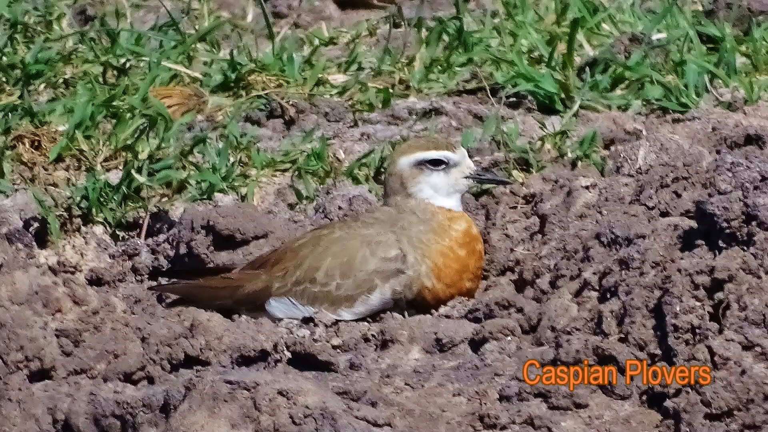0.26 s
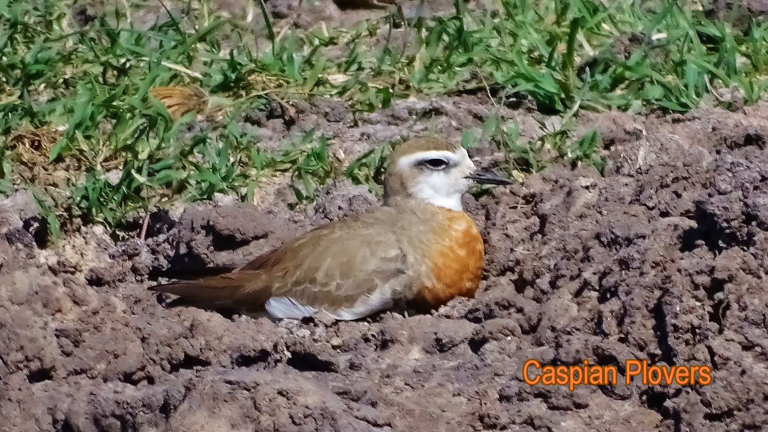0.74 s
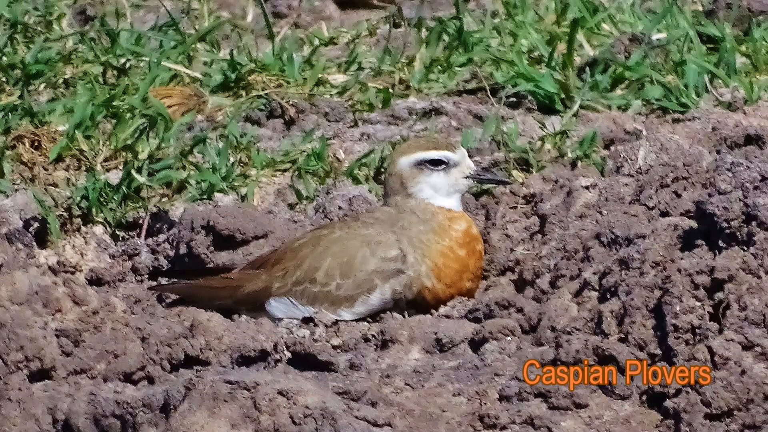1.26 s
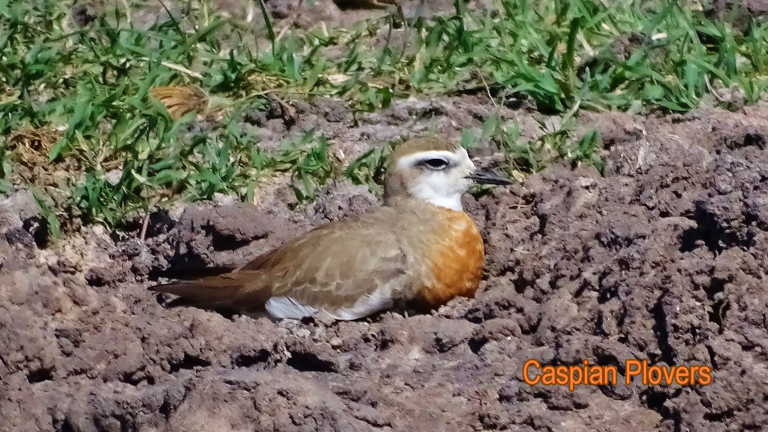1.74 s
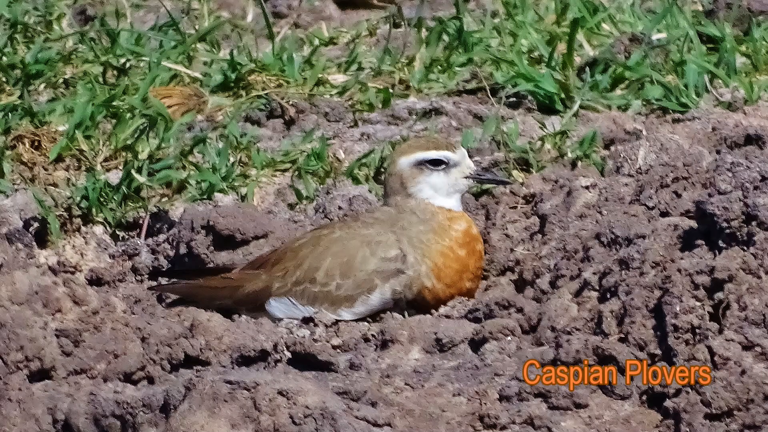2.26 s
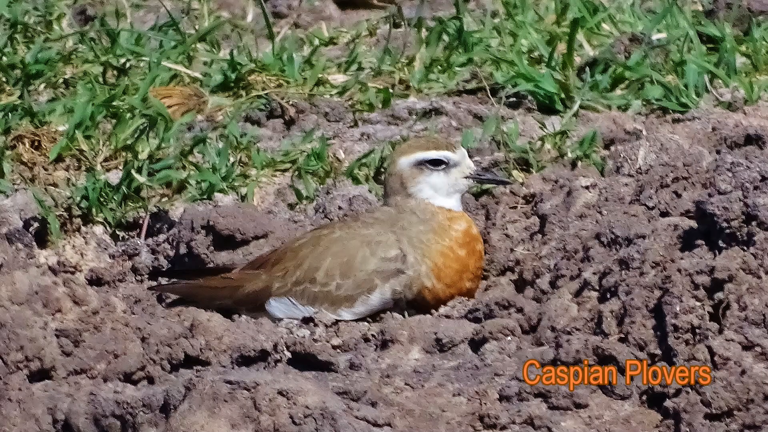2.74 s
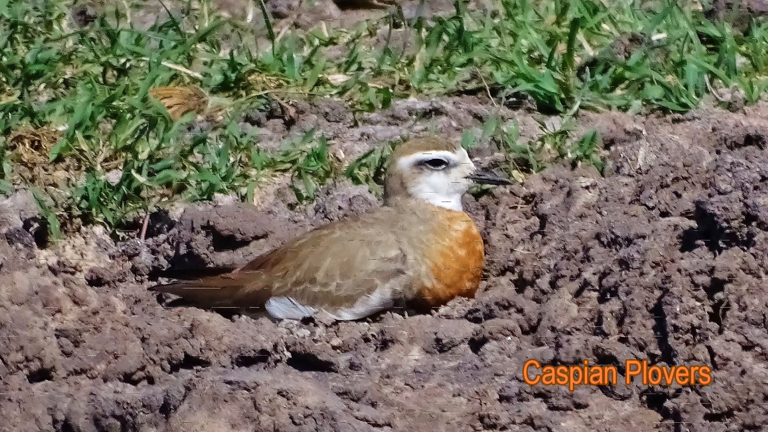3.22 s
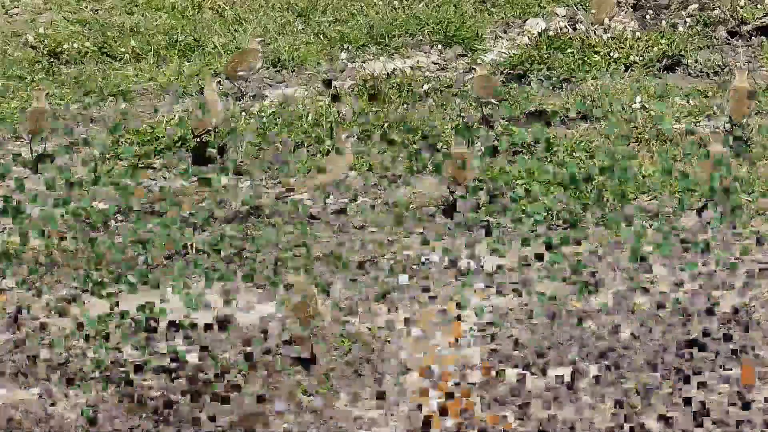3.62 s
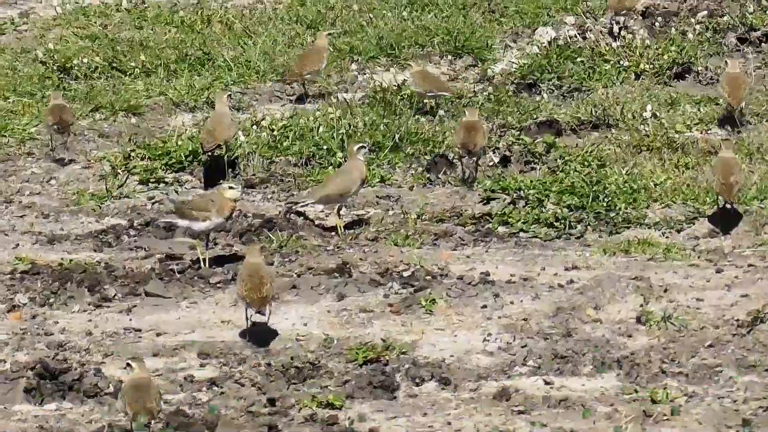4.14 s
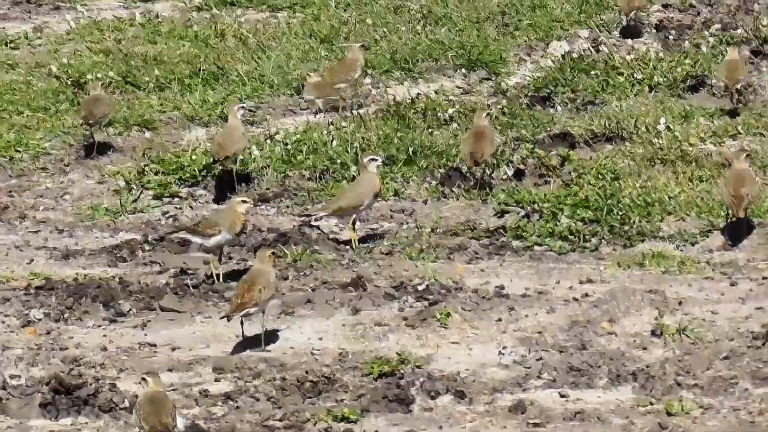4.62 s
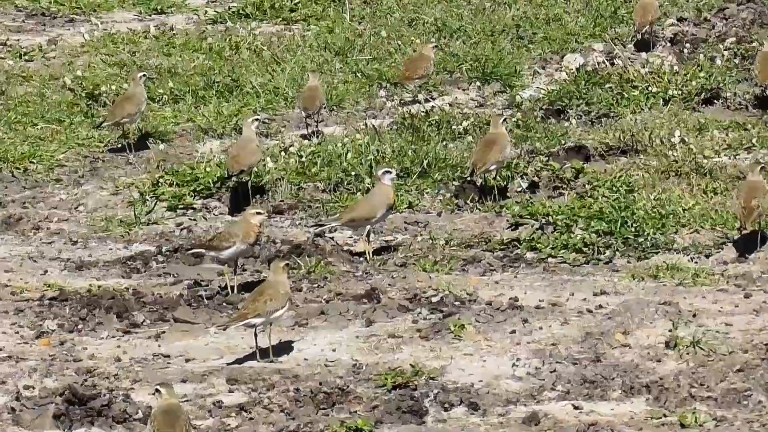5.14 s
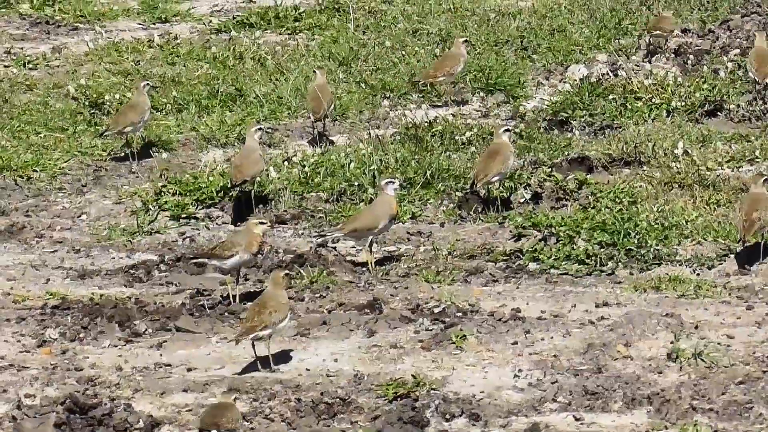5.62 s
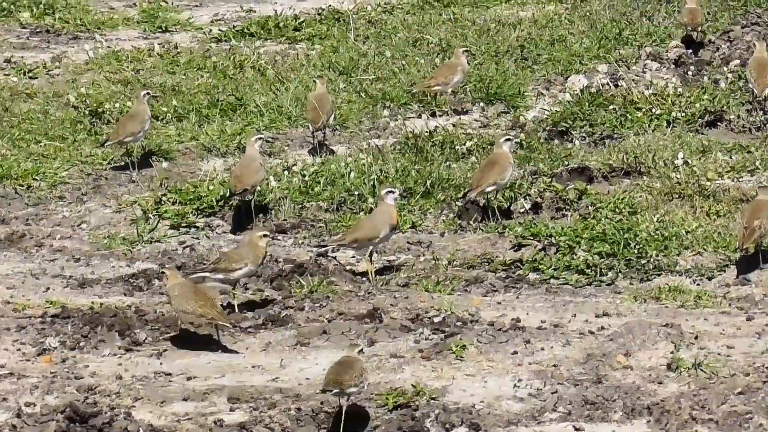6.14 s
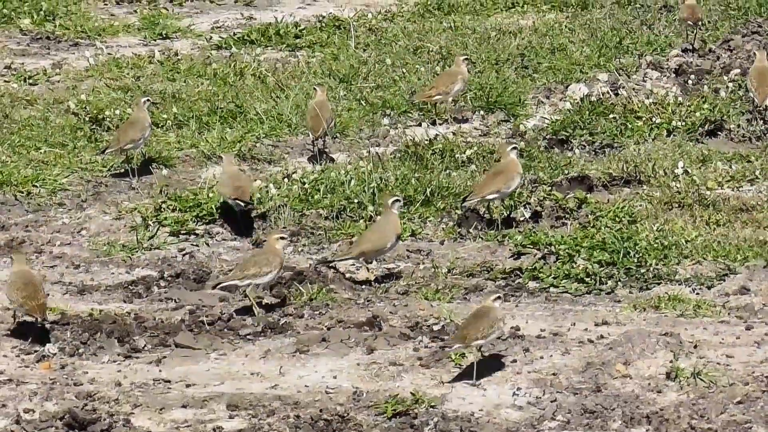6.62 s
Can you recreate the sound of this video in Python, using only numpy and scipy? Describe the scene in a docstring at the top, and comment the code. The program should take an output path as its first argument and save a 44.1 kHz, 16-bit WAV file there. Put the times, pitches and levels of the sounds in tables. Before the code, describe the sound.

Quiet outdoor air with a faint, uneven treble hiss. Small wading birds twitter in brief bending notes, with clusters of tiny flicks, while eight piercing, slightly rough chips punctuate the scene about every half second to second and scatter off soil and grass. Near the microphone are soft thuds, pops and crisp ticks. Behind everything, a distant bird gives a faint, low trilled phrase four times, starting shortly after the first chip.

```python
"""Small wading birds on open ground, over a low rush of air and a thin hiss of patchy shaped noise.
From the start come soft slurred twitters, bending tones with a short wash of echoes, and, near the
microphone, small knocks and ticks: decaying pops, thuds and noise bursts. After a second, sharp chips,
each one tone whipping up and down in pitch, scatter off clods and grass. Soon after the first chip, a far
bird begins its repeated low trilled phrase: two quavering hoots, then a run of short falling notes."""
import sys
import numpy as np
from scipy import signal
from scipy.fft import rfft, irfft, next_fast_len
from scipy.io import wavfile
from scipy.ndimage import uniform_filter1d, map_coordinates

SR = 44100
rng = np.random.default_rng(int(sys.argv[2]) if len(sys.argv) > 2 else 0)


def wav_out(sig):
    """Save sig, one row per channel (or a flat mono array), as 16-bit PCM at SR to the path in sys.argv[1]."""
    wavfile.write(sys.argv[1], SR, np.round(np.clip(np.atleast_2d(sig).T, -1, 1) * 32767).astype(np.int16))


N = 302967
TIME = np.arange(N) / SR

# Levels in the tables are relative: the source functions still add offsets, flutter and echoes.
# air and hiss over time: (t/s, air level/dB, hiss level/dB)
FLOOR_LEVELS = [(0.0, -56, -57), (0.65, -56.5, -52.5), (1.36, -55.5, -60.5), (2.22, -55.5, -54.5),
                (2.64, -56.5, -58), (3.69, -55, -54), (4.09, -56, -56.5), (4.38, -55, -57),
                (4.84, -54.5, -54), (5.07, -54, -58), (5.28, -57, -57.5), (6.31, -53.5, -56.5),
                (6.64, -54.5, -52), (6.87, -52, -56.5)]
# spectrum of the low rush of air: (f/Hz, density level/dB)
AIR_SPECTRUM = [(15, -74), (25, -18), (193, -2), (261, -4), (311, -5.5), (347, -7), (403, -9), (460, -9.5),
                (710, -8), (774, -6.5), (1490, -19), (1730, -14.5), (2500, -22.5), (4500, -25.5),
                (5850, -15), (9900, -120)]
# spectrum of the thin hiss: (f/Hz, density level/dB)
HISS_SPECTRUM = [(2500, -10), (4300, -13), (5600, -4.5), (7000, -0.5), (9000, 3.5), (11300, 1.5),
                 (13000, -5.5), (15500, -10.5)]
# likeness of the left and right noise: (f/Hz, correlation 0-1)
STEREO_LIKENESS = [(60, 0.65), (150, 0.99), (380, 0.71), (950, 0.8), (2380, 1), (5980, 0.82), (15000, 0.76)]

# single slurred notes: (t/s, length/s, start f/Hz, middle f/Hz, end f/Hz, level/dB)
SINGLE_SLURS = [ (.003, .012, 4650, 3930, 3400, -33), (.899, 0.015, 4900, 5250, 5250, -44.5),
                (.995, 0.0074, 3070, 3140, 3130, -30), (2.159, 0.088, 4470, 4840, 5130, -51.5),
                (2.61, .044, 5160, 4530, 4060, -53), (2.685, 0.025, 3950, 4570, 5200, -50),
                (2.713, 0.053, 3470, 3680, 3750, -54), (3.32, 0.055, 3770, 4150, 4630, -52.5),
                (3.385, 0.052, 4600, 4830, 4880, -41.5), (3.884, .053, 5300, 4680, 3780, -47.5),
                (3.95, .028, 3900, 4130, 4800, -49), (3.973, 0.0144, 4800, 5020, 5250, -34.5),
                (3.989, 0.043, 3120, 3480, 3250, -47.5), (4.33, 0.025, 5300, 3960, 2700, -43.5),
                (4.354, 0.028, 2880, 3560, 4000, -41), (4.421, 0.034, 6500, 5410, 5140, -35.5),
                (4.438, .022, 3990, 4280, 4100, -47), (4.604, 0.15, 8620, 8940, 9130, -44),
                (4.788, .048, 4800, 4360, 4670, -52), (4.845, 0.072, 4940, 5300, 2870, -46),
                (5.045, .03, 3050, 3310, 3350, -50), (5.097, 0.09, 4470, 3130, 3280, -47),
                (5.799, 0.039, 4080, 3350, 2320, -47), (5.85, .03, 2920, 2710, 2280, -50.5),
                (5.987, 0.028, 4200, 3380, 2480, -54), (6.19, 0.16, 4280, 2760, 2710, -52.5),
                (6.341, 0.082, 3570, 3900, 3950, -54.5), (6.437, 0.029, 6800, 4340, 3570, -47),
                (6.467, 0.0076, 6600, 5900, 5100, -27), (6.471, 0.056, 5300, 4960, 5060, -46),
                (6.559, 0.17, 2890, 3690, 3880, -46.5), (6.678, .04, 3740, 4270, 5170, -51),
                (6.51, 0.011, 8200, 8260, 8250, -35), (6.732, 0.036, 4400, 3450, 2620, -39.5)]
# longer twitter figure, note by note: (t into figure/s, length/s, start f/Hz, middle f/Hz, end f/Hz, level/dB)
LONG_FIGURE_NOTES = [ (0, 0.022, 6330, 5230, 4010, -4), (.006, 0.022, 3103, 3544, 4150, -6),
                     (.011, .041, 4157, 3180, 2250, -2), (.053, .019, 4630, 4200, 4630, -12.5),
                     (.062, 0.0243, 2100, 2930, 3020, -6), (.083, .042, 2700, 1775, 1670, -18),
                     (.084, .036, 4420, 3640, 3030, -7.5), (.125, .022, 2150, 2570, 3120, -13)]
# shorter twitter figure, note by note: (t into figure/s, length/s, start f/Hz, middle f/Hz, end f/Hz, level/dB)
SHORT_FIGURE_NOTES = [ (.003, 0.011, 6020, 4400, 3300, -6.5), (.02, .024, 2750, 3400, 3650, -3.5),
                      (.044, .027, 4950, 4330, 3350, -3.5), (.062, .027, 3740, 3110, 2660, 0.5),
                      (.084, 0.023, 2750, 1800, 1690, -16), (.097, 0.037, 3280, 3010, 2650, -17),
                      (.128, 0.016, 2290, 2360, 2800, -12)]
# starts of the longer figure: (t/s, level/dB)
LONG_FIGURE_STARTS = [(0.924, -31), (3.152, -35.5)]
# starts of the shorter figure, the first already under way at 0 s: (t/s, level/dB)
SHORT_FIGURE_STARTS = [(-.06, -33), (2.392, -33), (5.401, -36)]
# quick upward flicks: (t/s, middle f/Hz, level/dB)
UPWARD_FLICKS = [(4.379, 5260, -35.5), (4.45, 6100, -35), (4.474, 6130, -41), (6.397, 6040, -40),
                 (6.411, 6250, -33.5), (6.504, 6280, -28)]
FLICK_S, FLICK_RISE_HZ = 0.008, 1265
# fast runs of flicks: (start t/s, middle f/Hz, level/dB)
FLICK_RATTLES = [(4.71, 5230, -42)]
RATTLE_GAP_S = 0.014
# spells of faint flock chatter: (from t/s, to t/s)
CHATTER_SPELLS = [(5.6, 6.7)]
CHATTER_PER_S, CHATTER_DB, CHATTER_HZ, CHATTER_NOTE_S = 3, -57, 3700, .04  # level and pitch are centres

# soft knocks: (t/s, level/dB, pop f/Hz, thud level/dB)
SOFT_KNOCKS = [(0.06, -43, 1070, -8), (0.473, -42.5, 1220, 6), (0.497, -42, 643, 2.5),
               (1.004, -35, 810, -25), (1.12, -39, 732, 0.5), (1.169, -36, 1010, -7), (2.548, -41, 670, -7),
               (3.32, -32.5, 1056, -9), (3.388, -35, 1830, 0), (3.417, -37, 920, -16),
               (3.81, -35.5, 515, -2), (5.286, -58, 650, 18), (5.543, -36, 855, -30),
               (5.742, -40.5, 970, -8), (5.84, -41, 1190, -22), (6.181, -40, 759, -2),
               (6.494, -36.5, 880, -8), (6.672, -35.5, 925, -20)]
# dry ticks: (t/s, level/dB)
DRY_TICKS = [(1.6153, -39.5), (2.048, -35.5), (3.088, -38.5), (3.183, -35), (3.2041, -26), (3.5553, -29),
             (5.334, -38), (5.4782, -37.5), (5.5498, -32.5)]
# spectra of a knock's puff and a tick's crack: (f/Hz, density level/dB)
PUFF_SPECTRUM = [(80, -18), (250, 1.5), (1300, 6.5), (2500, -6), (6000, -14)]
CRACK_SPECTRUM = [(1000, -18), (5000, -7), (9000, 0), (12000, -3), (16000, -12)]

# one sharp chip each: (t/s, length/s, swoop period/s, roughness 0-1, left-right level/dB, left lead/s,
#   echo level/dB, octave level/dB, top treble level/dB, start f/Hz, opening level/dB, flare level/dB,
#   crest level/dB, bottoms of the three swoops [(f/Hz, effort level/dB)])
SHARP_CHIPS = [ (1.141, 0.062, 0.014, 0.085, 0, 0, -22.5, -9, -21, 6100, -10.5, 1, -4.5, [(4150, -19.5),
               (5650, -3.5), (6000, -21)]),
               (2.300, .043, .012, .38, 6.5, 4e-6, -11.5, -13, 4, 6730, -21.5, -5, -6, [(4350, -23),
               (4750, -25), (4830, -15)]),
               (2.765, 0.037, .0135, 0.47, 0, 8e-6, -21.5, -10.5, -12, 5450, -8.5, 16, -15, [(4180, -19.5),
               (5660, -4.5), (6100, -3.5)]),
               (3.663, 0.033, 0.013, 0.74, 3, 3.2e-5, -20.5, -9.5, 3.5, 7460, -6.5, -10, -11.5, [(2850, -13),
               (5250, -3), (5500, -6)]),
               (4.239, 0.048, 0.014, 0.7, 3, 3.2e-5, -19.5, -12.5, 7, 6430, -25.5, 0, -7, [(6690, -9),
               (5220, -7), (5110, -10.5)]),
               (4.979, 0.064, .0125, 0.35, 3, 2.5e-5, -18, -9, 3.5, 5550, -1, 4.5, -6, [(3500, -10.5),
               (5167, -5), (5180, -3)]),
               (5.863, 0.051, 0.015, 0.68, 1, -1.5e-5, -4.5, -12.5, 2, 6070, -17, 0, -5, [(4814, -18.5),
               (5240, -26), (5150, -14.5)]),
               (6.712, 0.048, 0.012, 0.33, 0, 0, -2.5, -27, -3, 5480, -26, -4, -14, [(4770, -17),
               (5000, -24.5), (5150, -18.5)])]
# resonance of the throat: (f/Hz, level/dB)
THROAT_RESONANCE = [(1500, -21), (2800, -17.5), (4000, -22.5), (4800, -15), (5600, -3.5), (6300, -8.5),
                    (7000, -9), (8500, -7.5), (11000, -12.5), (13500, -15.5), (15500, -35)]
# spectrum of the noise of strain in the voice: (f/Hz, density level/dB)
RASP_SPECTRUM = [(300, 6), (2000, 5), (4000, -6.5), (6000, 17), (9000, -3), (12000, -5), (16000, 13)]
# how much of a chip's top treble level applies: (f/Hz, share 0-1)
TREBLE_SHARE = [(10500, 0), (13000, 1)]
# tone of the long echo off grass: (f/Hz, level/dB)
GRASS_TONE = [(6500, 4.9), (11000, 4.3)]
ATTACK_S = .0032  # rise of a chip
OPENING_S, OPENING_HZ = .005, 5353  # a chip opens on a short note moving to this pitch
FIRST_DIP_S = .009  # bottom of the first swoop
CREST_HZ, LAST_CREST_HZ = 8500, 6780  # pitch between swoops, and after the last
FLARE_S, FLARE_WIDTH_S = 0.0132, 0.0011  # change of effort on the climb out of the first swoop
SAG_HZ_PER_S = 70000  # sinking of the pitch after the last crest
RELEASE_DB, ROUNDNESS = -21.5, 1.3  # fade after the last bottom; how long each swoop lingers low
RASP_REST, RASP_DB = .05, -7.5  # roughness of a calm voice; rasp level before roughness scales it

# starts of the far bird's phrases: (t/s, level/dB)
FAR_PHRASES = [(1.272, -47), (3.11, -45.5), (4.55, -47.5), (5.98, -48)]
# hoots that open the phrase: (t into phrase/s, length/s, start f/Hz, middle f/Hz, end f/Hz)
FAR_HOOTS = [(0, 0.111, 798, 925, 783), (.24, 0.078, 825, 836, 760)]

TOP_HZ = 16200  # band limit at the microphone


def amp(db):
    """Decibels to gain."""
    return 10 ** (np.asarray(db) / 20)


def unit(x):
    """x at rms 1."""
    return x / np.sqrt(np.mean(x ** 2) + 1e-20)


def along(points, hz):
    """Read (f/Hz, value) points on a log frequency axis."""
    f, v = np.transpose(points)
    return np.interp(np.log(hz + 1), np.log(f + 1), v)


def curves(rows):
    """One value per sample for each column after the time."""
    s, *cols = np.transpose(rows)
    return [np.interp(TIME, s, c) for c in cols]


def wobble(rate):
    """A smooth random curve, rate knots a second."""
    return map_coordinates(rng.standard_normal(N // 4), [TIME * rate], mode="wrap")


def filtered(x, response):
    """x through a gain that depends on frequency."""
    m = next_fast_len(N + 8192)
    return irfft(rfft(x, m) * response(np.fft.rfftfreq(m, 1 / SR)), m)[..., :N]


def add(track, s, sound):
    """Mix a sound into a track at time s."""
    part = track[max(round(s * SR), 0):][:len(sound)]
    part += sound[:len(part)]


def rush(spectrum, patchy_db):
    """Stereo noise of rms 1, with patches of random gain over time and frequency."""
    z = signal.stft(rng.standard_normal((2, N)), nperseg=512)[2]
    patches = uniform_filter1d(rng.standard_normal(z.shape[1:]), size=5, axis=0)
    patches = uniform_filter1d(patches, size=12, axis=1)
    pair = signal.istft(z * amp(patchy_db * unit(patches)), nperseg=512)[1][:, :N]

    def mid_side_gains(hz):
        # the mid-side balance sets the left-right correlation
        turn = np.arccos(np.clip(along(STEREO_LIKENESS, hz), -1, 1)) / 2
        return amp(along(spectrum, hz)) * [np.cos(turn), np.sin(turn)]

    mid, side = filtered(pair, mid_side_gains)
    return unit(np.array([mid + side, mid - side]))


def whistle(length, start_hz, middle_hz, end_hz, swell):
    """Envelope and phase of a note that bends through three pitches."""
    u = np.linspace(0, 1, max(int(length * SR), 8))
    pitch = np.polyval(np.polyfit([0, .5, 1], [start_hz, middle_hz, end_hz], 2), u)
    return np.abs(np.sin(np.pi * u)) ** swell, 2 * np.pi * np.cumsum(pitch) / SR


def scatter(x, t60, width):
    """Diffuse echoes off rough ground; every half second of sound meets other paths."""
    t = np.arange(SR // 2) / SR
    decay = amp(-60 * t / t60) * (1 - np.exp(-t / 0.00022))
    out = np.zeros((2, N))
    for start in range(0, N, len(t)):
        mid, side = rng.standard_normal((2, len(t))) * decay
        for track, tail in zip(out, (mid + width * side, mid - width * side)):
            echo = signal.fftconvolve(x[start:start + len(t)], tail / np.linalg.norm(tail))
            add(track, start / SR, echo)
    return out


def air():
    """Open air as low shaped noise with a slow drift in level, under a thin hiss of treble noise."""
    air_db, hiss_db = curves(FLOOR_LEVELS)
    drift_db = .4 * wobble(9)
    low = amp(air_db + 4.5 + drift_db) * rush(AIR_SPECTRUM, patchy_db=3.0)
    hiss = amp(hiss_db + 3.5) * rush(HISS_SPECTRUM, patchy_db=1.2)
    return low + hiss


def twitter_notes(count=5):
    """Every soft note as a slur: figures, single slurs, flicks, a rattle and faint random chatter."""
    notes = list(SINGLE_SLURS)
    for figure, starts in (
            (LONG_FIGURE_NOTES, LONG_FIGURE_STARTS), (SHORT_FIGURE_NOTES, SHORT_FIGURE_STARTS)):
        for s, db in starts:
            for delay, *shape, note_db in figure:
                if s + delay >= 0:
                    notes.append((s + delay, *shape, db + note_db))
    rattle = [(s + k * RATTLE_GAP_S, hz, db) for s, hz, db in FLICK_RATTLES for k in range(count)]
    for s, hz, db in UPWARD_FLICKS + rattle:
        notes.append((s, FLICK_S, hz - FLICK_RISE_HZ / 2, hz, hz + FLICK_RISE_HZ / 2, db))
    for start, end in CHATTER_SPELLS:
        for s in np.arange(start, end, 1 / CHATTER_PER_S):
            late, pitch, slope, bend, loud = rng.uniform(-1, 1, size=5)
            contour = np.array([-1, bend / 2, 1])
            hz = CHATTER_HZ * np.exp(.25 * pitch + .17 * slope * contour)
            notes.append((s + late / CHATTER_PER_S / 2, CHATTER_NOTE_S, *hz, CHATTER_DB + 2 * loud))
    return notes


def twitters():
    """Soft, slightly unsteady slurs, doubled by a near reflection, in a short wash of echoes."""
    voice = np.zeros(N)
    waver = wobble(600)
    for s, length, start_hz, middle_hz, end_hz, db in twitter_notes():
        envelope, phase = whistle(length, start_hz, middle_hz, end_hz, swell=.85)
        here = round(s * SR) + np.arange(len(phase))
        note = amp(db) * envelope * np.sin(phase + .3 * waver[here])
        add(voice, s, note)
        add(voice, s + 0.02, amp(-29) * note)  # the near reflection
    voice *= amp(2.4 * wobble(260) - 1)
    # fast flutter spreads a skirt around each note
    husk = amp(-14) * voice * wobble(2200)
    source = voice + husk
    return source + amp(-4.5) * scatter(source, t60=0.2, width=0.16)


def knocks():
    """Dull taps: a few cycles of a pitched pop, a low thud and a puff; ticks are tiny bright cracks."""
    t = np.arange(SR // 10) / SR
    taps, puffs, cracks = np.zeros((3, N))
    for s, db, hz, thud_db in SOFT_KNOCKS:
        pop = np.sin(2 * np.pi * hz * t) * amp(-60 * t / 0.014)
        thud = np.sin(2 * np.pi * 210 * t) * amp(thud_db - 60 * t / 0.041)
        onset = 1 - np.exp(-t / 0.0013)
        add(taps, s, amp(db + 8) * (pop + 0.73 * thud) * onset)
        add(puffs, s, amp(db - 5 - 60 * t / 0.078))
    for s, db in DRY_TICKS:
        add(cracks, s, amp(db - 60 * t / .014))
    puff = rush(PUFF_SPECTRUM, patchy_db=1)
    crack = rush(CRACK_SPECTRUM, patchy_db=2)
    return taps + puffs * puff + cracks * crack


def chip_pitch(t, dips, period, start_hz, low_hz):
    """Pitch of a chip in Hz, and its climb: height 0-1 within the swoop and span to the crest in Hz."""
    # height is 0 at the bottom of a swoop and 1 at the crest between two
    cycles = np.clip((t - FIRST_DIP_S) / period, 0, len(dips) - .5)
    height = np.abs(np.sin(np.pi * cycles)) ** (2 * ROUNDNESS)
    bottom = np.interp(t, [0, OPENING_S, *dips], [start_hz, OPENING_HZ, *low_hz])
    crest = np.interp(t, [dips[-1] - period / 2, dips[-1]], [CREST_HZ, LAST_CREST_HZ])
    span = crest - bottom
    sag = SAG_HZ_PER_S * np.maximum(t - dips[-1] - period / 2, 0)
    return bottom + height * span - sag, height, span


def chips(count=3):
    """One tone swoops three times through the throat resonance; strain adds rasp, rough ground echoes."""
    direct, sent = np.zeros((2, N)), np.zeros(N)
    jitter, flutter = wobble(3500), wobble(900)
    rasp = unit(filtered(rng.standard_normal(N), lambda hz: amp(along(RASP_SPECTRUM, hz))))
    for (s, length, period, rough, pan_db, lead, echo_db, octave_db, treble_db,
         start_hz, opening_db, flare_db, crest_db, swoops) in SHARP_CHIPS:
        low_hz, low_db = np.transpose(swoops)
        t = np.arange(0, length, 1 / SR)
        here = round(s * SR) + np.arange(len(t))
        dips = FIRST_DIP_S + period * np.arange(count)
        pitch, height, span = chip_pitch(t, dips, period, start_hz, low_hz)

        effort_db = np.interp(t, [OPENING_S, *dips], [opening_db, *low_db])
        effort_db += crest_db * height * span / (CREST_HZ - OPENING_HZ)
        effort_db += RELEASE_DB * np.clip((t - dips[-1]) / max(length - dips[-1], ATTACK_S), 0, 1)
        effort_db += flare_db * np.exp(-((t - FLARE_S) / FLARE_WIDTH_S) ** 2)
        attack = np.sin(np.pi / 2 * np.minimum(t / ATTACK_S, 1)) ** 2
        effort = amp(effort_db + 2 * rough * flutter[here]) * attack * signal.windows.tukey(len(t), .06)

        phase = 2 * np.pi * np.cumsum(pitch) / SR + .55 * rough * jitter[here]
        octave = amp(octave_db) * np.sin(2 * phase)
        strain = amp(RASP_DB) * (rough + RASP_REST) * rasp[here]
        sheen = amp(treble_db * along(TREBLE_SHARE, np.fft.rfftfreq(len(t), 1 / SR)))
        for track, side in zip(direct, (1, -1)):  # left, right
            arriving = phase + side * np.pi * pitch * lead
            tone = np.sin(arriving) + octave + strain
            chip = irfft(rfft(effort * tone) * sheen, len(t))
            add(track, s, amp(side * pan_db / 2) * chip)
        add(sent, s, amp(echo_db) * chip)  # the right-hand arrival feeds the long echo

    throat = lambda hz: amp(along(THROAT_RESONANCE, hz))
    direct, sent = filtered(direct, throat), filtered(sent, throat)
    clods = amp(-5) * scatter(direct.mean(axis=0), t60=0.053, width=0.71)
    field = scatter(sent, t60=0.42, width=0.42)
    field = filtered(field, lambda hz: amp(along(GRASS_TONE, hz)))  # grass dulls the echo
    return direct + clods + field


def far_bird(count=9):
    """Two quavering hoots, then an uneven run of short falling notes that tends to grow stronger."""
    voice = np.zeros(N)
    for s, db in FAR_PHRASES:
        for delay, *note in FAR_HOOTS:
            envelope, phase = whistle(*note, swell=.5)
            quaver = wobble(90)[:len(phase)]
            add(voice, s + delay, amp(db - 2) * envelope * np.sin(phase + quaver))
        for k in range(count):
            envelope, phase = whistle(0.0243, 973, 829, 674, swell=0.46)
            late, sharp, loud = rng.standard_normal(3)
            start = s + .343 + k * .0332 + .002 * late
            level = amp(db - 2 + .3 * k + loud)
            add(voice, start, level * envelope * np.sin(phase * (1 + .025 * sharp)))
    voice *= amp(1.5 * wobble(45))
    return voice + amp(-5.5) * scatter(voice, t60=0.054, width=0.15)


def scene():
    """All the birds and the ground around them."""
    return air() + twitters() + knocks() + chips() + far_bird()


def record(dry):
    """The microphone has a deep dip in the treble, and a band limit."""
    dip = lambda hz: amp(-17 * np.exp(-np.abs((hz - 7550) / 780) ** 2.1))
    return filtered(dry, lambda hz: dip(hz) * (hz < TOP_HZ))


dry = scene()
out = record(dry)
wav_out(out)
```